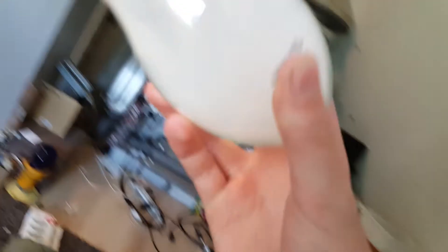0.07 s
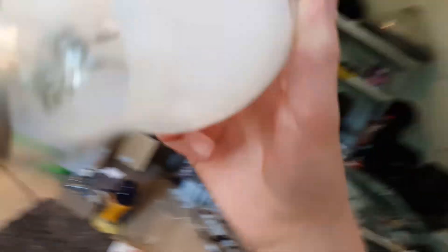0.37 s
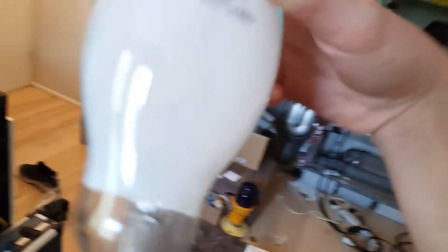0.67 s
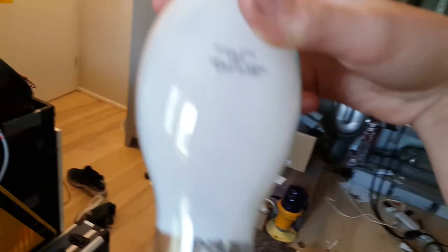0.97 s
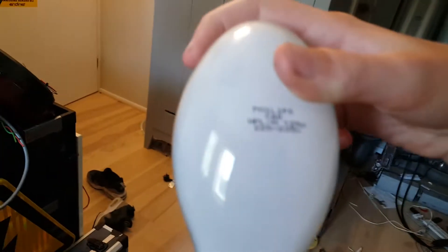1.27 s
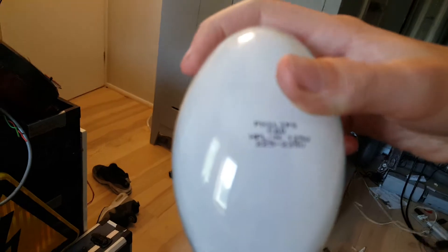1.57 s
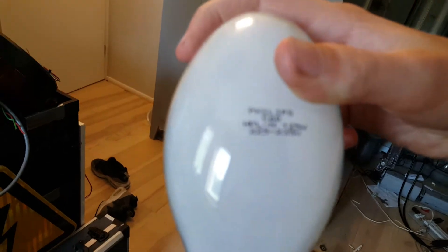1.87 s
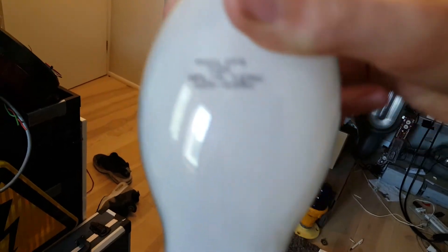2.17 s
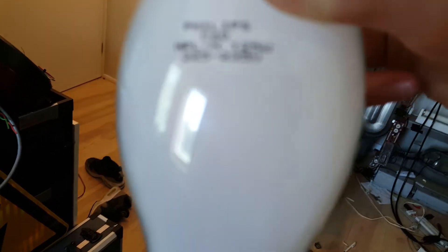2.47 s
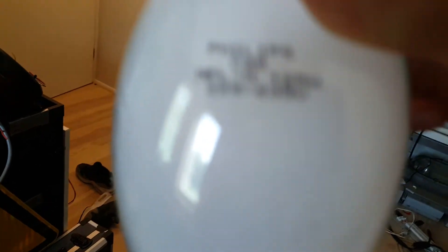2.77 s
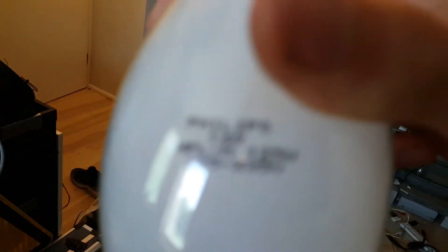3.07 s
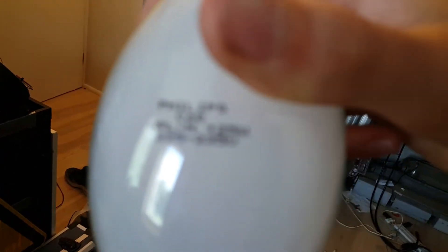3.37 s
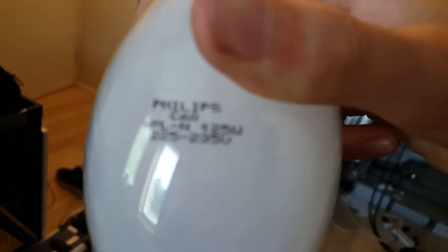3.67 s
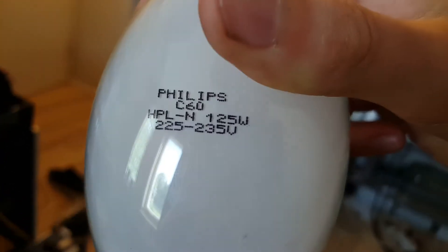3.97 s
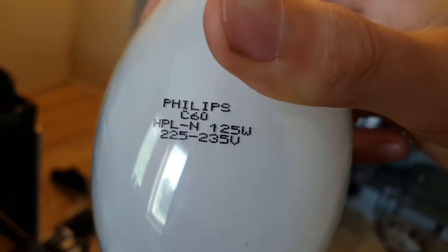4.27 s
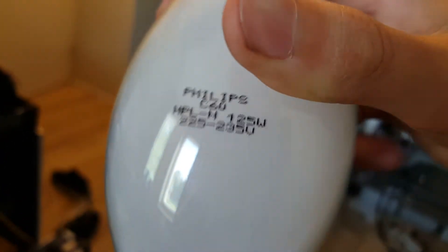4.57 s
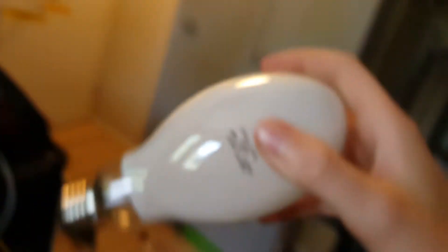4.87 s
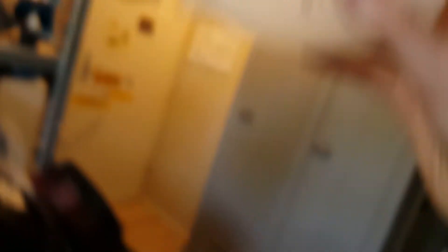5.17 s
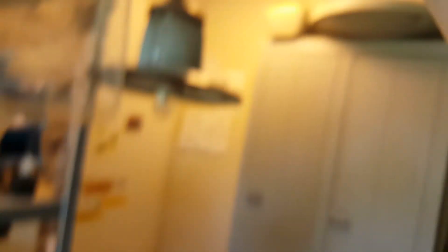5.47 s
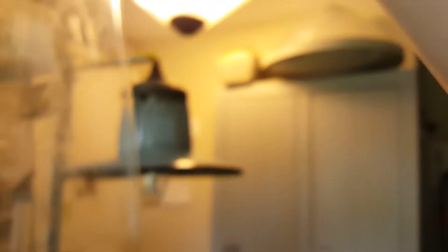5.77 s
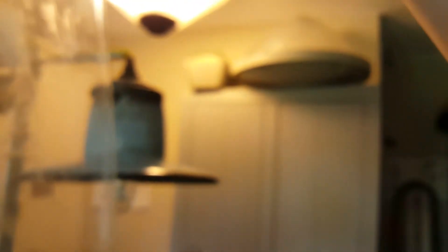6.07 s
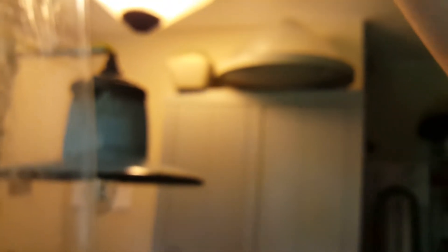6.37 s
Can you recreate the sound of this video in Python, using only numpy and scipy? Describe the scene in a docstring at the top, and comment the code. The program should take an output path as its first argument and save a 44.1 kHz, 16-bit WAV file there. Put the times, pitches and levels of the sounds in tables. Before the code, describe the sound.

Low room rumble and hiss lie under barely audible rubbing and fingertip taps as a glass bulb is handled close to the microphone. After about five seconds, the bulb meets a hard surface with several small clinks and one sharp one. Then a hollow lamp fixture is knocked in two quick clusters, the first louder, each leaving a short, clear metallic ping. The small room adds a short echo.

```python
"""Putting down a glass bulb

A large glass bulb is turned in the hand in a quiet small room, with faint rubs and taps.
Then it is put down: glass and metal cap clink on a hard top, and a second run of knocks
shakes a hollow lamp fixture whose metal rings on. Each hit is a set of fading tones plus a
noisy clatter. The two microphones of a nearby phone hear it all with the room's echo."""
import sys
import numpy as np
from scipy import signal
from scipy.fft import rfft, irfft
from scipy.io import wavfile
from scipy.ndimage import uniform_filter1d

SR = 44100
rng = np.random.default_rng(int(sys.argv[2]) if len(sys.argv) > 2 else 0)


def to_wav(sig):
    """Store sig (one row per channel, or 1-D mono) as 16-bit WAV at the path in sys.argv[1].

    Samples outside -1..1 are clipped; the rate is SR.
    """
    pcm = np.clip(np.atleast_2d(sig), -1, 1) * 32767
    pcm = np.round(pcm).astype(np.int16)
    wavfile.write(sys.argv[1], SR, pcm.T)  # frames by channels


N = 287532
HIT_SIZE = 32768  # samples in one hit and its echo
AGE = np.arange(HIT_SIZE) / SR  # seconds since the hit


def undb(db):
    """Turn decibels into a gain."""
    return 10 ** (np.asarray(db) / 20)


def along(points, hz):
    """Read between (frequency, value) points on a log-frequency axis."""
    f, value = np.transpose(points)
    return np.interp(np.log(hz + 1e-3), np.log(f), value)


def shape(x, response):
    """Filter a sound; response gives the gain at each frequency."""
    size = x.shape[-1]
    return irfft(rfft(x) * response(np.fft.rfftfreq(size, 1 / SR)), size)


def unit(x, size=None):
    """Scale to an average (rms) level of 1, over the first size samples if given."""
    return x / np.sqrt(np.mean(x[..., :size] ** 2))


def band(x, lo_hz, hi_hz, order=2):
    """Keep the sound between two frequencies."""
    sos = signal.butter(order, [lo_hz, min(hi_hz, .49 * SR)], "band", fs=SR, output="sos")
    return signal.sosfilt(sos, x)


def add(out, s, sound):
    """Mix a sound in at s seconds."""
    start = int(s * SR)
    out[:, start:start + sound.shape[-1]] += sound[:, :N - start]


def wander(per_second):
    """A smooth random wobble with a spread near 1."""
    hold = int(SR / per_second)
    steps = np.repeat(rng.standard_normal(N // hold + 1), hold)
    return unit(uniform_filter1d(uniform_filter1d(steps, hold), hold)[:N])


def diffuse(size, mic_gap_m=0.15):
    """Noise from all sides: alike at both microphones in the bass, unrelated in the treble."""
    likeness = lambda f: .8 * np.sinc(2 * f * mic_gap_m / 343)  # sound travels at 343 m/s
    mid = shape(rng.standard_normal(size), lambda f: np.sqrt(1 + likeness(f)))
    side = shape(rng.standard_normal(size), lambda f: np.sqrt(1 - likeness(f)))
    return np.array([mid + side, mid - side]) / 2


def tone(hz, db, fade_s):
    """One ringing tone. A fade time is how long a sound takes to drop by 60 dB."""
    return undb(db - 60 * AGE / fade_s) * np.sin(2 * np.pi * hz * AGE)


def fade(noise, fade_times):
    """Let each frequency range die away at its own pace."""
    centres = [hz for hz, _ in fade_times]
    out = 0
    for share, (_, fade_s) in zip(np.eye(len(centres)), fade_times):
        part = shape(noise, lambda f: along(list(zip(centres, share)), f))
        out += part * undb(-60 * AGE / fade_s)
    return out


def in_room(sound, room_db, near_db, near_fade_s=0.081, first_echo_s=0.0016, right_lag_s=.00018):
    """Sound reaches the left microphone first; nearby surfaces echo at once, the walls linger."""
    # how long the walls echo: (frequency [Hz], fade time [s])
    wall_fades = [(150, 0.92), (400, 0.43), (1200, 0.37), (4000, 0.25), (12000, 0.26)]
    direct = np.array([sound, np.interp(AGE - right_lag_s, AGE, sound, left=0)])
    arrival = np.clip(AGE / first_echo_s - 1, 0, 1)
    near = unit(diffuse(HIT_SIZE) * arrival * undb(-60 * AGE / near_fade_s))
    near = band(near, 600, 18000, order=1)  # long waves pass round small things
    walls = unit(fade(diffuse(HIT_SIZE), wall_fades) * arrival)
    echoes = (undb(near_db) * near + undb(room_db) * walls) / np.sqrt(HIT_SIZE)
    return direct + signal.fftconvolve(sound[None], echoes, axes=1)[:, :HIT_SIZE]


def air(level_db=-67.5):
    """The still air of the room: a steady low rumble under even hiss."""
    # tone colour of the air: (frequency [Hz], relative level [dB])
    colour = [(20, -2.5), (40, -11), (62, -6.5), (92, 0), (125, -8.5), (170, -4), (260, -8), (450, -14),
              (900, -17), (2000, -19.5), (4500, -26.5), (8400, -30.5), (9800, -33.5), (13000, -30)]
    return undb(level_db) * unit(shape(diffuse(N), lambda f: undb(along(colour, f))))


def rubbing(grip_db=-85.5, rise_share=0.46, slip_db=1.05):
    """Skin and sleeve slide in small uneven slips; each stroke speeds up, then eases off."""
    # shifts of the grip: (time of fastest slide [s], level [dB], length [s])
    strokes = [(.04, -70.5, 0.6), (.35, -68, 0.2), (.63, -71, 0.46), (1.05, -69, 0.37), (4.76, -66.5, 0.21),
               (5.06, -68.5, 0.8), (5.487, -62.5, 0.12), (6.05, -62, 0.27), (6.306, -61, 0.36)]
    # tone colour of the rub: (frequency [Hz], relative level [dB])
    colour = [(60, -31.5), (300, -0.5), (900, 3), (2400, -1), (4500, -11.5), (8600, -14), (9600, -22),
              (16000, -28)]
    t = np.arange(N) / SR
    power = undb(grip_db) ** 2  # the holding hand never rests entirely
    for s, db, length_s in strokes:
        slope_s = length_s * np.where(t < s, rise_share, 1 - rise_share)
        speed = np.exp(-((t - s) / slope_s) ** 2)
        power = power + (undb(db) * speed) ** 2
    hiss = unit(shape(diffuse(N), lambda f: undb(along(colour, f))))
    return hiss * np.sqrt(power) * undb(slip_db * wander(per_second=75))


def taps(decay_cycles=0.47):
    """A fingertip gives one quickly dying swing; the room carries the rest."""
    # light taps of handling: (time [s], level [dB], pitch [Hz], room echo [dB])
    touches = [(.301, -66, 1020, -0.5), (.41, -70, 1320, -7), (1.977, -59.5, 139, -16),
               (1.979, -70, 880, -12), (2.036, -68, 610, 1), (2.037, -72.5, 1980, 3.5),
               (2.795, -74, 880, -14), (4.936, -66, 490, 2), (5.145, -73, 460, -19),
               (5.004, -57, 1860, 1.5)]
    out = np.zeros((2, N))
    for s, db, hz, room_db in touches:
        swing = np.exp(-AGE * hz / decay_cycles) * np.cos(2 * np.pi * hz * AGE)
        tap = undb(db) * unit(band(swing, hz / 4, hz * 1.6), SR // 50)
        add(out, s, in_room(tap, room_db, near_db=room_db - 15))
    return out


def hums_and_thud():
    """Two faint low hums swell and fade; handling the phone gives one short, deep thud."""
    # two hums, then the thud: (peak time [s], level [dB], pitch [Hz], band width [Hz], half length [s])
    low_sounds = [(2.13, -69.5, 165, 25.6, 0.069), (3.5, -66.5, 174.6, 25, 0.084),
                  (5.484, -62.5, 30.6, 23.6, 0.046)]
    t, out = np.arange(N) / SR, np.zeros(N)
    for s, db, hz, width_hz, half_s in low_sounds:
        noise = shape(rng.standard_normal(N), lambda f: np.exp(-(2 * (f - hz) / width_hz) ** 2))
        out += undb(db) * unit(noise) * np.exp(-((t - s) / half_s) ** 2)
    return out


def strike(hits, tones, colour, clatter_db, room_db, near_db, thump_rise_s):
    """Each hit sets off ringing and clatter, split into a low thump, a middle clack and a high tick."""
    # how long the clatter lasts: (frequency [Hz], fade time [s])
    clatter_fades = [(200, 0.12), (1000, 0.12), (4000, 0.048), (12000, 0.044)]
    out = np.zeros((2, N))
    attack = SR // 40  # levels are set over the first 25 ms
    ring = sum((-1) ** k * tone(hz, db, fade_s) for k, (hz, db, fade_s) in enumerate(tones))
    for s, thump_db, clack_db, tick_db, ring_db, hardness_hz in hits:
        noise = shape(rng.standard_normal(HIT_SIZE), lambda f: undb(along(colour, f)))
        clatter = fade(noise, clatter_fades)
        sound = undb(ring_db) * unit(ring, attack) + undb(clatter_db) * unit(clatter, attack)
        # the heavy support starts moving a moment after the hard contact
        thump = band(sound * (1 - np.exp(-(AGE / thump_rise_s) ** 2)), 50, 520, order=4)
        clack = band(sound, 598, 1870, order=4)
        # a softer contact lasts longer and leaves the highest tones quiet
        tick = band(band(sound, 2250, 19000, order=4), 20, hardness_hz, order=1)
        parts = [(thump_db, thump), (clack_db, clack), (tick_db, tick)]
        hit = sum(undb(db) * unit(part, attack) for db, part in parts)
        add(out, s, in_room(hit, room_db, near_db))
    return out


def bulb_clinks():
    """The glass and its metal cap clink on the hard top."""
    # contacts: (time [s], thump [dB], clack [dB], tick [dB], ring in the mix [dB], hardness [Hz])
    clinks = [(5.558, -46.5, -51.5, -55, -4.5, 4000), (5.562, -47, -46.5, -45, -20, 16000),
              (5.585, -41, -41, -54.5, 9, 2500), (5.606, -51.5, -51.5, -56, -4.5, 2000),
              (5.634, -37.5, -45, -43.5, -5.5, 3000), (5.669, -21, -24.5, -23.5, 1, 14300),
              (5.696, -41, -32.5, -31, -7, 9000), (5.795, -44.5, -52, -64, 0.5, 2000),
              (5.888, -48.5, -42, -50, -3.5, 1194)]
    # natural tones of the bulb on its support: (pitch [Hz], relative level [dB], fade time [s])
    tones = [(176, -17.5, 0.18), (236.9, -9.5, .2), (282.5, -1, 0.086), (331.2, 0, 0.17), (489, -4.5, 0.13),
             (722, -0.5, 0.13), (1308, -8.5, 0.16), (1445, -5.5, 0.078), (2336, -13.5, 0.14),
             (2760, -13, 0.086), (3310, -13, 0.11), (4944, -0.5, 0.07), (6870, -25, .1), (7660, -13, 0.1),
             (12080, -13.5, 0.1)]
    # clatter of many short-lived vibrations: (frequency [Hz], relative level [dB])
    colour = [(40, -37), (110, -18), (190, -11), (310, 2.5), (600, -2.5), (1300, -2.5), (1950, -9.5),
              (2900, -6), (5000, -17.5), (8000, -15.5), (10000, -27.5), (12500, -25.5), (16000, -20)]
    return strike(clinks, tones, colour, clatter_db=0.5, room_db=-10.5, near_db=-1, thump_rise_s=0.005)


def metal_pings():
    """Thin metal parts sing with long, pure tones when they are jolted."""
    # ringing parts: (time [s], pitch [Hz], level [dB], fade time [s])
    pings = [(5.563, 7490, -45, 0.26), (6.117, 3100, -34, 0.15), (6.148, 3090, -43, .14),
             (6.169, 1467, -22.5, 0.34), (6.365, 1481, -35.5, 0.47), (6.367, 3140, -47, .17),
             (6.379, 7730, -49, 0.1)]
    out = np.zeros((2, N))
    for s, hz, db, fade_s in pings:
        add(out, s, in_room(tone(hz, db, fade_s), room_db=-14, near_db=-10.5))
    return out


def fixture_knocks():
    """Knocks shake the hollow lamp fixture, and its metal rings on."""
    # contacts: (time [s], thump [dB], clack [dB], tick [dB], ring in the mix [dB], hardness [Hz])
    knocks = [(6.076, -47, -70, -74, 5, 8950), (6.1158, -19.5, -29, -33.5, 11, 8050),
              (6.146, -20.5, -24, -31, 1.5, 7000), (6.158, -26, -28, -36.5, 3.5, 11900),
              (6.167, -37, -21, -31.5, -9.5, 14900), (6.348, -36, -37, -58, -12.5, 14000),
              (6.36, -46.5, -24.5, -54, 15, 4040), (6.386, -44.5, -36, -59.5, 7, 2540),
              (6.485, -47, -76, -81, -6.5, 3000)]
    # natural tones of the fixture: (pitch [Hz], relative level [dB], fade time [s])
    tones = [(215.5, -15, 0.87), (254.5, -18, 0.89), (308, 5, 0.13), (342.4, -5, 0.18), (391.4, 3, 0.15),
             (479, 0.5, 0.126), (629, -6.5, 0.038), (720.6, -0.5, 0.13), (753.7, -1.5, 0.1),
             (970, -23.5, 0.13), (1440, -31, 0.16), (3136, -12.5, 0.078), (3270, -22.5, 0.092),
             (3540, -25, 0.14), (7440, -31, 0.066), (7370, -18.5, 0.027)]
    # clatter of many short-lived vibrations: (frequency [Hz], relative level [dB])
    colour = [(40, -35), (160, -10.5), (260, 0.5), (480, 5), (900, -8), (1350, -3), (2100, -20.5),
              (3200, -14), (4500, -31), (6300, -36.5), (7800, -16), (9500, -37), (13000, -28.5),
              (16000, -34)]
    return strike(knocks, tones, colour, clatter_db=-0.5, room_db=-12, near_db=-2, thump_rise_s=0.0039)


def facing(sound):
    """The phone's body favours one microphone or the other, depending on the frequency."""
    # the left microphone faces the objects: (frequency [Hz], left minus right [dB])
    balance = [(100, 1.5), (350, 1.5), (700, 5), (1300, -0.5), (2600, 3), (8000, 4), (12000, -2.5)]
    padded = np.pad(sound, ((0, 0), (0, HIT_SIZE)))
    return shape(padded, lambda f: undb(np.outer([1, -1], along(balance, f)) / 2))[:, :N]


def scene():
    """Quiet handling, then the clinks of the bulb and the knocks on the fixture."""
    hits = bulb_clinks() + fixture_knocks() + metal_pings()
    return facing(hits) + taps() + rubbing() + hums_and_thud() + air()


def record(dry):
    """The phone cuts the very highest treble."""
    top_hz = 15800
    return signal.sosfilt(signal.ellip(10, .2, 80, top_hz, fs=SR, output="sos"), dry)


dry = scene()
out = record(dry)
to_wav(out)
```